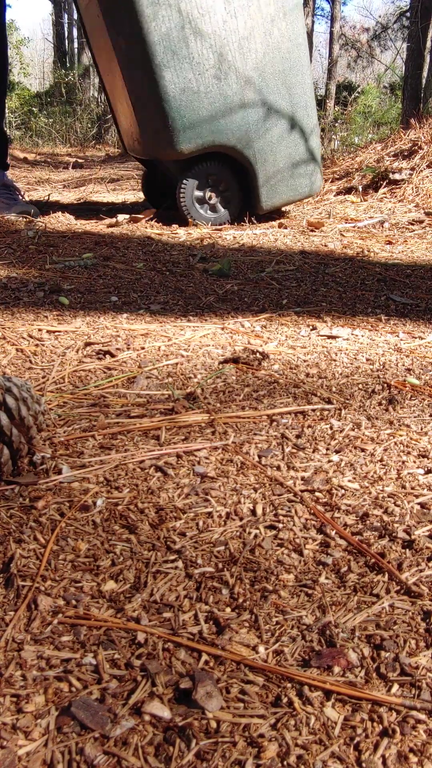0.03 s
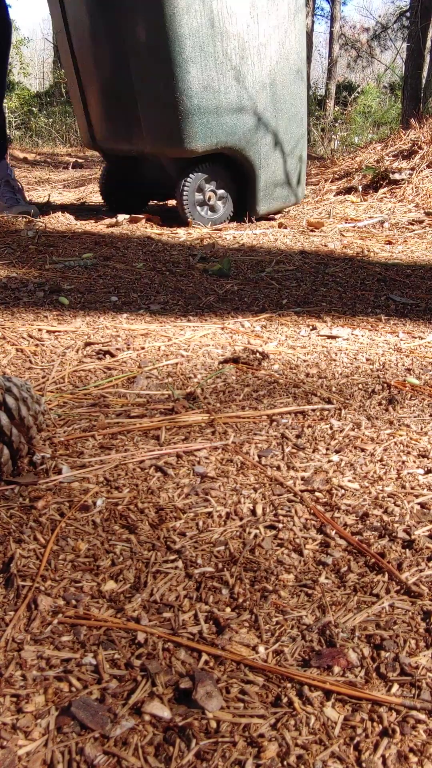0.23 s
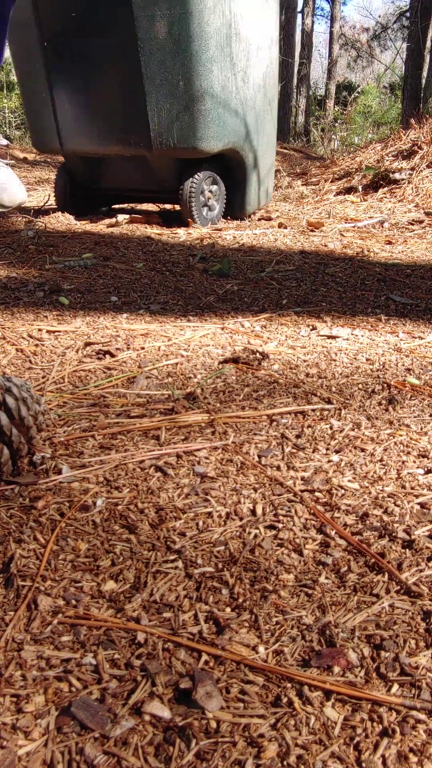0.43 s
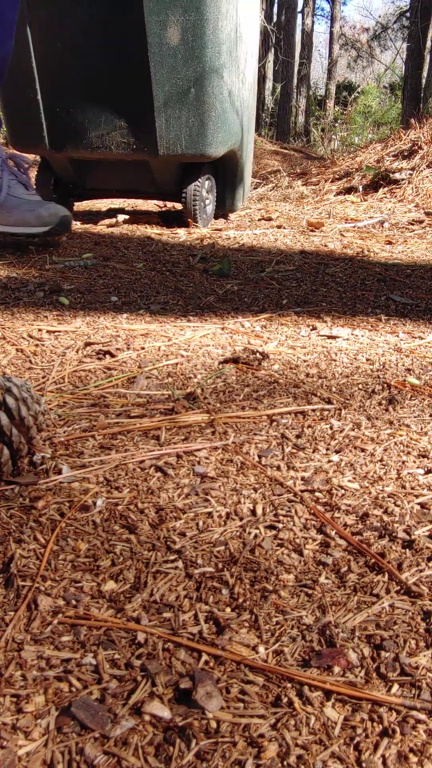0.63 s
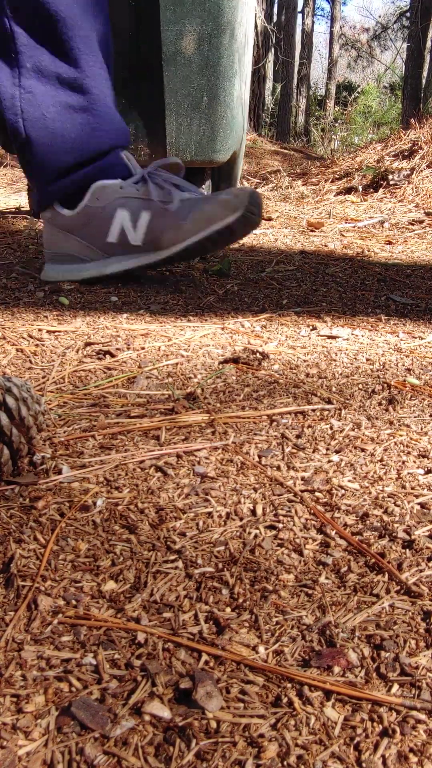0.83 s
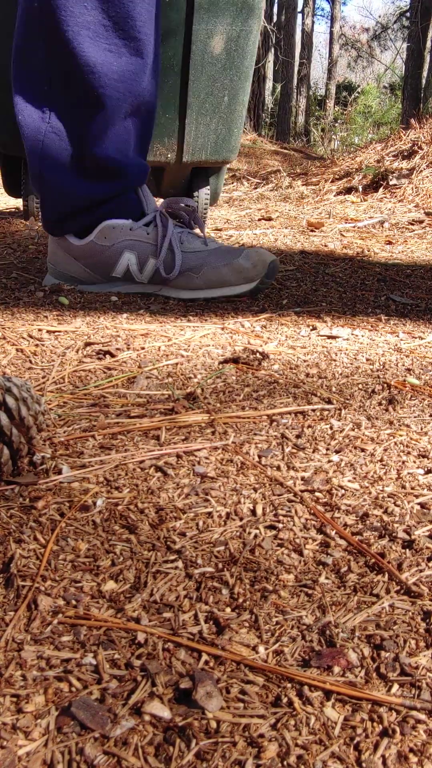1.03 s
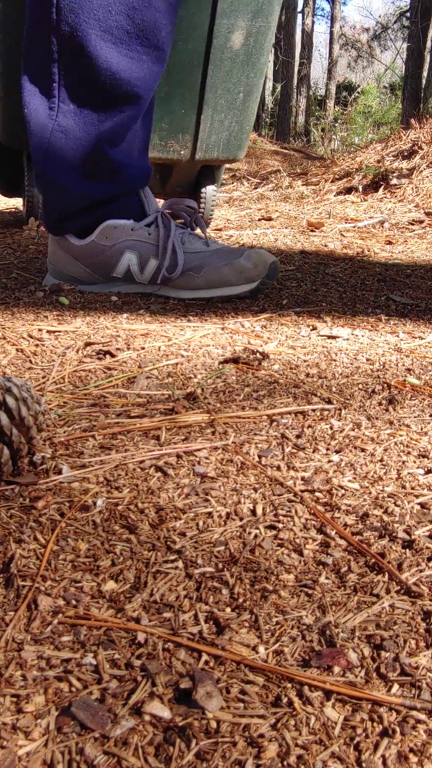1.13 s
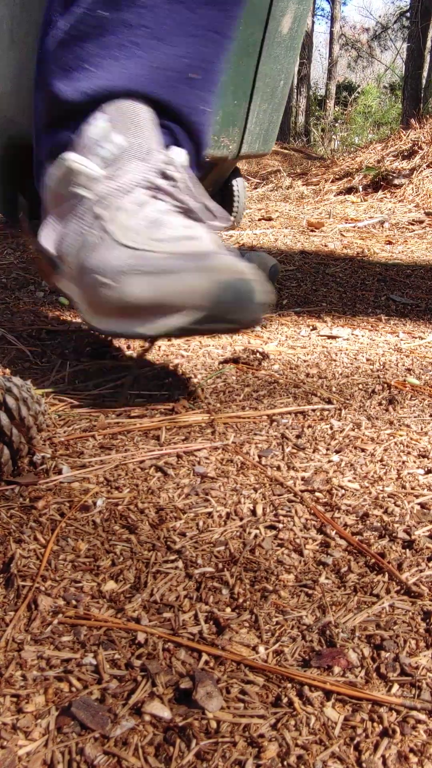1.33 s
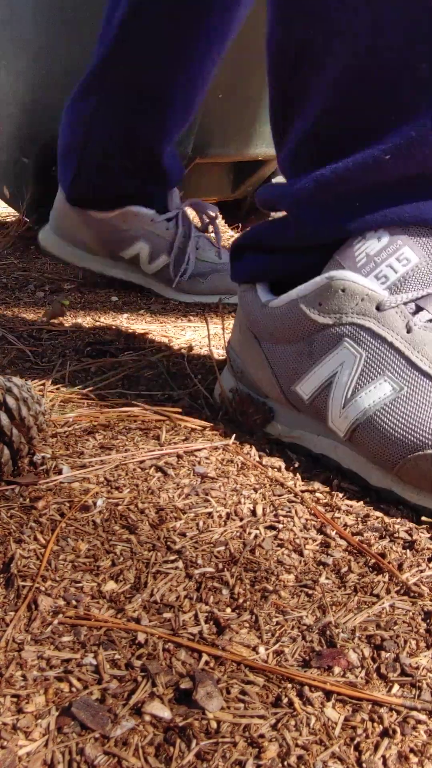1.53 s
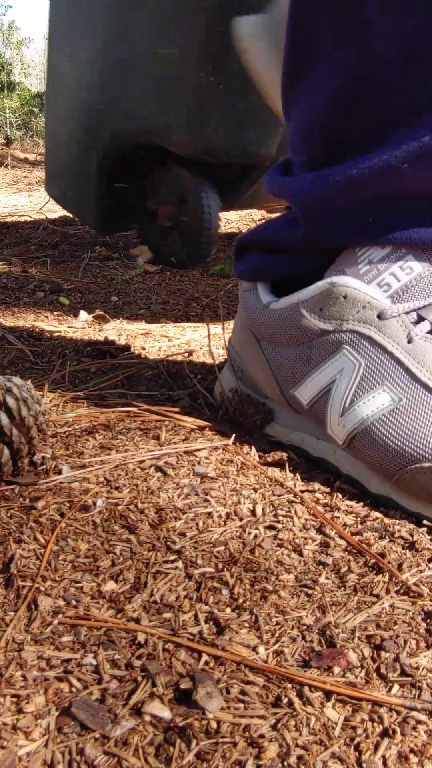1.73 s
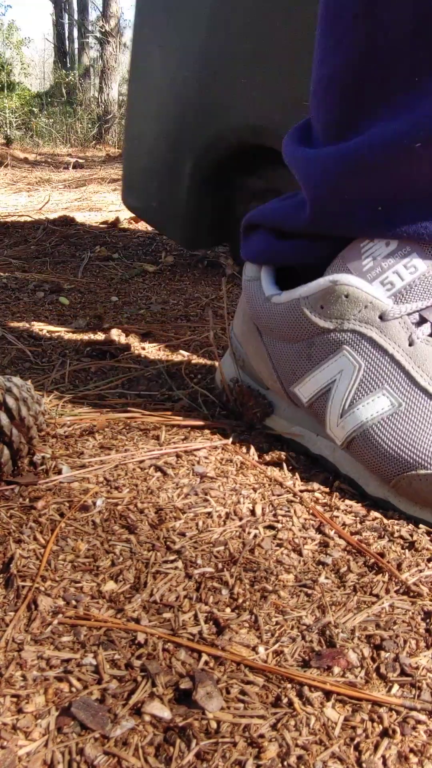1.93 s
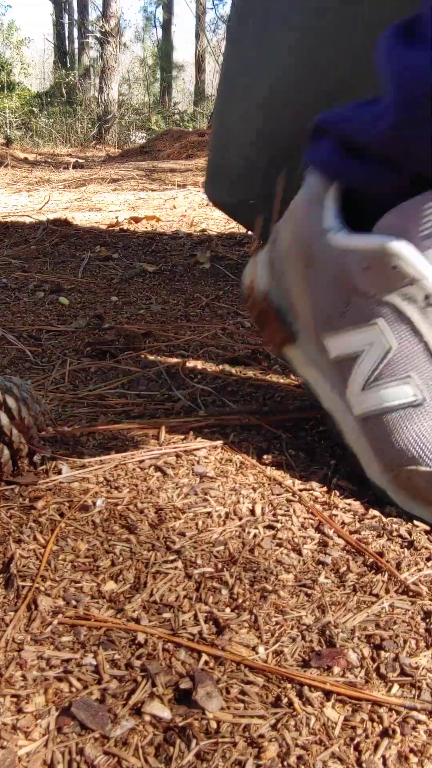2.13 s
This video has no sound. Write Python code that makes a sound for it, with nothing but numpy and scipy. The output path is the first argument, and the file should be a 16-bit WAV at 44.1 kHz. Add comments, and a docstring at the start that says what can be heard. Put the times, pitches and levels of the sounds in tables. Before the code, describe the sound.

Outdoors at ground level, a big empty plastic bin gives one booming knock and low rolling rumble, light litter crackles, then close footsteps thud and crunch with brittle twig snaps, with faint air buffeting the microphone.

```python
"""A hollow plastic wheeled bin thuds as it is tipped onto its wheels, then rumbles and knocks over dry litter.
Struck sines ring its walls and wheels, its cavity booms, and coloured clicks make the rumble; a wheel groans.
Sneaker soles thud and chips clack as decaying sines; mulch, needles and brushing shoes are ringing grains over noise.
Twigs snap in short noise bursts over a faint hiss. Two ports hear it all, and soft low air buffets the left one."""
import sys
import numpy as np
from scipy import signal
from scipy.fft import rfft, irfft, next_fast_len
from scipy.io import wavfile

SR = 44100
rng = np.random.default_rng(int(sys.argv[2]) if len(sys.argv) > 2 else 0)


def store_wav(level_fs):
    """Save 16-bit WAV to argv[1]."""
    pcm = np.round(np.clip(np.atleast_2d(level_fs), -1, 1) * 32767)
    wavfile.write(sys.argv[1], SR, pcm.T.astype(np.int16))


N = 97020
T = np.arange(N) / SR
SIZE = next_fast_len(N + SR // 2, real=True)
HZ = np.maximum(np.arange(SIZE // 2 + 1) * SR / SIZE, 1)
PATHS = 3   # the direct path and a scattered one to each port

# ringing of the bin's walls: (frequency [Hz], level [dB], t60 [s])
SHELL_MODES = [(136.1, -4.5, 0.15), (185.7, -7, 0.22), (224.3, -10.5, 0.28), (276.3, -7, 0.16),
               (306, -23, 0.2), (363.6, -9.5, 0.18), (457.6, -8, 0.095), (531, -18, 0.12), (595, -17, 0.14),
               (679.4, -10, 0.089), (770, -22, 0.23), (948.6, -14.5, 0.059), (1230, -38, 0.07)]
# tone of crunching needles and woody breaks: (frequency [Hz], level [dB])
CRUNCH_COLOUR = [(600, 6), (1200, 5), (1700, 3.5), (2300, 5), (3100, -6), (4500, -12.5), (7000, -29.5),
                 (16000, -81)]
# bright tone of brushed needles, splinters and hiss: (frequency [Hz], level [dB])
BRUSH_COLOUR = [(2000, 8), (5000, -7), (6800, 8.5), (8000, 0.5), (9500, 4), (11200, -4.5), (13000, 15),
                (16000, 2.5)]
CRACKLES_PER_S = 2700
RUSTLE_SHARE = 0.85   # smooth noise against ringing grains, as a ratio of amplitudes


def from_db(db):
    """Decibels to gain."""
    return 10 ** (np.asarray(db) / 20)


def rms_one(x):
    """Scale to unit power."""
    return x / np.sqrt(np.mean(x ** 2) + 1e-20)


def in_time(rows):
    """Gain curves from rows of (time [s], level [dB], ..), straight lines in dB."""
    s, *columns = np.transpose(rows)
    return [from_db(np.interp(T, s, c)) for c in columns]


def at_hz(points):
    """Read a table over log frequency."""
    hz, value = np.transpose(points)
    return np.interp(np.log(HZ), np.log(hz), value)


def fade(t, t60):
    """A fall of 60 dB in t60 seconds."""
    return np.exp(-np.log(1000) * t / t60)


def bump(s, width):
    """A bell-shaped swell of height 1 around time s."""
    return np.exp(-.5 * ((T - s) / width) ** 2)


def colour(x, spectrum):
    """Causal filter with the given spectrum, falling on beyond its top; white noise keeps its power."""
    beyond_top = np.maximum(HZ / spectrum[-1][0], 1)
    gain = rms_one(from_db(at_hz(spectrum)) / beyond_top ** 2)
    # fold the cepstrum forward in time for minimum phase
    cepstrum = irfft(np.log(gain), SIZE)
    cepstrum[1:SIZE // 2] *= 2
    cepstrum[SIZE // 2 + 1:] = 0
    return irfft(rfft(x, SIZE) * np.exp(rfft(cepstrum)), SIZE)[..., :N]


def add(out, s, db, sound):
    """Mix a sound in at a time and level."""
    i = int(np.clip(s * SR, 0, N - 1))
    out[..., i:i + sound.shape[-1]] += from_db(db) * sound[..., :N - i]


def ring(excitation, hz, t60):
    """Two-pole resonator: a unit click sets a sine of height 1 ringing."""
    r = fade(1 / SR, t60)
    w = 2 * np.pi * min(hz, SR * .45) / SR
    return signal.lfilter([0, np.sin(w)], [1, -2 * r * np.cos(w), r * r], excitation + 1e-18)


def partials(modes, t):
    """One dying sine for each mode, in alternating signs."""
    return np.array([(-1) ** k * from_db(db) * np.sin(2 * np.pi * hz * t) * fade(t, t60)
                     for k, (hz, db, t60) in enumerate(modes)])


def clicks(per_s, spread_db):
    """Random clicks, many small and a few large; unit power."""
    sizes = from_db(spread_db * np.minimum(rng.exponential(1, N), 5))
    signs = rng.choice([-1, 1], N)
    return rms_one(sizes * signs * (rng.random(N) < per_s / SR))


def burst(envelope):
    """Even noise under an envelope, different on each path."""
    return np.sign(rng.standard_normal((PATHS, len(envelope)))) * envelope


def grains(per_s, spread_db, low_hz, high_hz, rustle, count=10):
    """Tiny fractures, each ringing a few cycles at a pitch dealt separately on each path, over a smooth rustle."""
    grain_cycles = 8.7   # cycles in a grain's 60 dB fall
    born = clicks(per_s, spread_db) * rng.choice([-1, 1], (PATHS, N))
    dealt = rng.integers(0, count, (PATHS, N))
    ringing = 0
    for k, hz in enumerate(np.geomspace(low_hz, min(high_hz, SR * .45), count)):
        # higher grains are shorter, and start louder in proportion to pitch
        ringing = ringing + ring(born * (dealt == k), hz, grain_cycles / hz) * hz
    return rms_one(rms_one(ringing) + rustle * rng.standard_normal((PATHS, N)))


def rolling():
    """Small bumps under the wheels keep the cavity and the walls humming."""
    # rumble of the rolling bin: (time [s], cavity level [dB], wall level [dB])
    rumble = [(0, -55, -37.5), (.1, -53, -51), (.18, -40.5, -42), (.3, -37.5, -43), (.48, -43.5, -49),
              (.6, -34.5, -54), (.67, -40, -51.5), (.77, -46.5, -43.5), (.88, -43, -53.5),
              (.98, -44, -43.5), (1.12, -47.5, -52.5), (1.28, -39.5, -50.5), (1.35, -54.5, -77),
              (1.43, -34.5, -49.5), (1.57, -46.5, -42.5), (1.68, -45, -49.5), (1.82, -38, -40.5),
              (2.08, -40.5, -42.5), (2.2, -40, -61.5)]
    # hum of the hollow cavity: (frequency [Hz], level [dB])
    cavity_colour = [(20, -40.5), (45, -8), (65, -12.5), (90, -3), (120, 5), (145, -8.5), (200, -9.5),
                     (400, -65)]
    # hum of the walls: (frequency [Hz], level [dB])
    wall_colour = [(60, -24.5), (140, -1), (190, 5), (270, 9), (370, 1.5), (470, -3), (700, -32.5),
                   (1500, -42)]
    bumps_per_s, wall_ring_db = 260, -16
    cavity_gain, wall_gain = in_time(rumble)
    bumps = clicks(bumps_per_s, 3.5)
    ringing = rms_one(sum((-1) ** k * from_db(db) * ring(bumps, hz, t60)
                          for k, (hz, db, t60) in enumerate(SHELL_MODES)))
    walls = rms_one(colour(bumps, wall_colour) + from_db(wall_ring_db) * ringing)
    cavity = rms_one(colour(clicks(bumps_per_s, 0.87), cavity_colour))
    return cavity_gain * cavity + wall_gain * walls


def litter():
    """Mulch crumbles dully under soles and tyres; dry needles on top crunch and crackle, in uneven clusters."""
    # crushed mulch: (time [s], level [dB])
    crush_levels = [(0, -39), (.09, -49.5), (.145, -48.5), (.3, -52), (.41, -43.5), (.49, -57),
                    (.58, -48.5), (.605, -43), (.67, -48), (.72, -53), (.845, -55.5), (.865, -42),
                    (.96, -41), (1.06, -54), (1.25, -59), (1.34, -74), (1.41, -50), (1.47, -49.5),
                    (1.53, -36.5), (1.68, -47.5), (1.86, -45), (2.12, -45.5), (2.2, -51)]
    # dull tone of mulch: (frequency [Hz], level [dB])
    mulch_colour = [(150, -13), (350, 11), (550, 2.5), (950, 3.5), (1300, -0.5), (1800, -17.5),
                    (3000, -13.5), (8000, -74)]
    # breaking needles: (time [s], crunch level [dB], fine crackle level [dB])
    needle_levels = [(0, -55, -53), (.035, -44, -60.5), (.08, -66, -58.5), (.3, -59.5, -60),
                     (.43, -53.5, -59), (.49, -61.5, -58.5), (.575, -59.5, -56.5), (.605, -46.5, -47),
                     (.65, -66, -63.5), (.745, -55.5, -56), (.83, -73, -66), (.875, -55.5, -67),
                     (.95, -49.5, -56.5), (1.1, -58.5, -61.5), (1.2, -60, -61), (1.26, -53, -57),
                     (1.3, -77, -71), (1.345, -65, -72.5), (1.38, -60, -62), (1.47, -59, -55.5),
                     (1.52, -40.5, -47.5), (1.6, -48, -57.5), (1.69, -55, -55.5), (1.82, -56, -50),
                     (1.925, -49, -49), (1.96, -52, -54.5), (2.11, -46.5, -49), (2.2, -50, -55)]
    # bright tone of the fine crackle: (frequency [Hz], level [dB])
    crackle_colour = [(1500, -3.5), (3500, -4), (5500, -5.5), (6700, 6.5), (7900, -6.5), (9400, -4),
                      (11200, -17), (12500, -1), (15500, -15.5), (17000, 0.5)]
    crumbs_per_s, crunches_per_s = 1800, 1500
    clumps_per_s, clump_db = 90, 1.4
    knots = np.arange(0, T[-1] + 1, 1 / clumps_per_s)
    unevenness = np.interp(T, knots, rng.standard_normal(len(knots)))
    clumps = rms_one(from_db(clump_db * unevenness))
    crush_gain, = in_time(crush_levels)
    crunch_gain, crackle_gain = in_time(needle_levels)
    crumbs = grains(crumbs_per_s, 1.7, 369, 1870, RUSTLE_SHARE)
    crunches = grains(crunches_per_s, 2.5, 1300, 10200, 0.93)
    crackles = grains(CRACKLES_PER_S, 3, 2100, 18600, RUSTLE_SHARE)
    mulch = crush_gain * rms_one(colour(crumbs, mulch_colour))
    crunch = clumps * crunch_gain * rms_one(colour(crunches, CRUNCH_COLOUR))
    # the crackle follows the clusters more gently
    crackle = np.sqrt(clumps) * crackle_gain * rms_one(colour(crackles, crackle_colour))
    return mulch + crunch + crackle


def air_hiss():
    """A steady faint hiss of coloured noise."""
    return from_db(-72) * colour(rng.standard_normal((PATHS, N)), BRUSH_COLOUR)


def knocks():
    """Each jolt gives a slap, crack and rattle, ringing walls and wheels, and a boom that swells as its pitch settles."""
    # the bin is jolted: (time [s], shell level [dB], cavity boom level [dB], rattle level [dB], crack level [dB])
    jolts = [(0.002, -30, -27, -38, -57), (0.022, -40.5, -22.5, -35, -35.5), (0.143, -33.5, -40, -74, -64),
             (0.1997, -15.5, -1.5, -15, -15), (0.213, -25.5, -16, -25, -61), (0.247, -28, -19.5, -58, -68),
             (0.2871, -44, -27.5, -60, -70), (0.3461, -47, -62.5, -34, -38), (0.3839, -36, -51, -30, -26.5),
             (0.595, -54, -52, -42, -50), (0.659, -36.5, -55, -43.5, -72), (0.7729, -42, -51, -50, -41),
             (0.854, -47, -40, -39, -64), (0.877, -50, -34.5, -35.5, -39.5), (1.391, -33, -29, -53, -65),
             (1.486, -21, -46, -29, -29.5), (1.497, -36, -21.5, -28, -50),
             (1.513, -26.5, -33, -26.5, -29.5), (1.556, -32, -20, -47, -51),
             (1.782, -32.5, -20, -28, -34.5), (1.912, -55, -58, -40, -44), (1.931, -47, -62, -38, -42),
             (2.021, -29, -23, -46, -53), (2.095, -35, -37, -48, -55)]
    # hard wheels ring after a crack: (frequency [Hz], level [dB], t60 [s])
    wheel_modes = [(1500, -16, .06), (1670, -10, 0.095), (1844, -10, 0.042), (2110, -23.5, .07),
                   (2530, -21, 0.066), (2660, -28, 0.064), (3450, -24.5, 0.082), (4800, -33, 0.054)]
    # loose wheels and lid rattle: (frequency [Hz], level [dB])
    rattle_colour = [(40, -71), (80, -14), (200, 1), (400, 0), (700, 5.5), (1000, 5), (1500, -13.5),
                     (3000, -31.5), (8000, -45)]
    # hard plastic contact: (frequency [Hz], level [dB])
    crack_colour = [(300, -3.5), (900, 4), (1400, 5.5), (1900, 8), (2600, -1.5), (4000, -6.5), (5500, -14),
                    (6600, -12), (9000, -13.5), (11000, -60), (16000, -35)]
    boom_hz, boom_rise_hz, boom_settle_s = 129.4, 48.6, 0.017
    boom_swell_s, boom_t60_s = 0.017, 0.094
    thump_hz, thump_db, thump_t60_s = 66.2, -24, 0.38   # the ground gives under a jolt
    rattle_t60_s = 0.054
    crack_t60_s, crack_tail_db, crack_tail_t60_s = 0.0065, -18, 0.12
    push_db, slap_db = 14, 1.5   # first hard contact, above the rattle and crack that follow
    mode_spread_db = 1.2   # each jolt excites the wall modes a little differently

    shell, boom, rattle, crack = np.zeros((4, PATHS, N))
    t = T[:SR // 2]
    pitch = boom_hz - boom_rise_hz * np.exp(-t / boom_settle_s)
    swell = (1 - np.exp(-(t / boom_swell_s) ** 2)) * fade(t, boom_t60_s)
    cavity = np.sin(2 * np.pi * np.cumsum(pitch) / SR) * swell / swell.max() / 2
    thump = from_db(thump_db) * np.sin(2 * np.pi * thump_hz * t) * fade(t, thump_t60_s)
    modes = partials(SHELL_MODES, t)
    wheels = partials(wheel_modes, t).sum(axis=0)
    crack_envelope = fade(t, crack_t60_s) + from_db(crack_tail_db) * fade(t, crack_tail_t60_s)
    contact = np.zeros((PATHS, len(t)))
    contact[0, 0] = -1   # one click, on the direct path only
    for s, shell_db, boom_db, rattle_db, crack_db in jolts:
        mode_gains = from_db(rng.normal(0, mode_spread_db, len(SHELL_MODES)))
        add(shell, s, shell_db, mode_gains @ modes)
        add(shell, s, crack_db, wheels)
        add(boom, s, boom_db, cavity + thump)
        add(rattle, s, rattle_db, from_db(push_db) * contact + burst(fade(t, rattle_t60_s)))
        add(crack, s, crack_db, from_db(slap_db) * contact + burst(crack_envelope))
    return shell + boom + colour(rattle, rattle_colour) + colour(crack, crack_colour)


def twigs():
    """Each snap is a dry tick with a woody crunch and a spray of bright splinters, all short noise bursts."""
    # single twigs snap: (time [s], dry tick level [dB], woody crunch level [dB], bright splinter level [dB])
    snaps = [(.003, -38.5, -59, -74), (0.035, -41.5, -43, -70), (.127, -42.5, -74, -46.5),
             (.1995, -32.5, -45, -63), (.345, -48, -47, -63), (.386, -51, -32.5, -68),
             (.595, -71, -50, -63), (.679, -43.5, -75.5, -58), (.774, -46, -53, -45),
             (0.878, -51, -56, -50), (0.953, -48, -30, -46), (1.355, -67, -49.5, -66),
             (1.389, -45.5, -69, -46), (1.516, -35.5, -28, -32), (1.558, -52, -35, -60),
             (1.576, -53, -45, -60), (1.6, -40.5, -32, -53), (1.674, -45, -36.5, -59),
             (1.735, -39.5, -49, -60), (1.851, -39.5, -43, -42), (1.855, -34, -33, -44),
             (1.867, -39.5, -33, -59), (1.883, -38, -46, -49), (1.913, -31, -44, -44),
             (1.917, -55, -31, -43), (1.926, -42.5, -30.5, -40), (1.934, -43, -32, -54),
             (1.952, -50, -59.5, -63), (1.985, -49, -31, -64), (2.072, -39, -45, -62),
             (2.081, -45, -41, -59), (2.119, -61, -43, -60), (2.153, -42, -55, -39.5),
             (2.192, -33.5, -44, -53)]
    # tone of the dry tick: (frequency [Hz], level [dB])
    tick_colour = [(1500, -5), (3500, -8.5), (5500, -4), (6700, 10.5), (7900, -9.5), (9400, -1),
                   (11200, -25), (13000, -4), (16000, -5)]
    snap_rise_s, snap_t60_s, woody_t60_s = 0.00012, 0.009, 0.015
    ticks, wood, splinters = np.zeros((3, PATHS, N))
    t = T[:SR // 20]
    snap = (1 - np.exp(-t / snap_rise_s)) * fade(t, snap_t60_s)
    snap = snap / snap.max()
    for s, tick_db, wood_db, splinter_db in snaps:
        add(ticks, s, tick_db, burst(snap))
        add(wood, s, wood_db, burst(fade(t, woody_t60_s)))
        add(splinters, s, splinter_db, burst(snap))
    return colour(ticks, tick_colour) + colour(wood, CRUNCH_COLOUR) + colour(splinters, BRUSH_COLOUR)


def wind():
    """Soft low puffs of air: dark noise under bell-shaped swells."""
    # air buffets the port: (time [s], width [s], level [dB])
    puffs = [(.12, 0.051, -42.5), (.48, 0.076, -41.5), (.94, 0.023, -34), (1.03, 0.051, -42)]
    # low tone of the air: (frequency [Hz], level [dB])
    wind_colour = [(15, -13), (45, 1.5), (70, 3.5), (130, -14), (300, -39), (900, -78)]
    gusts = sum(from_db(db) * bump(s, width) for s, width, db in puffs)
    return gusts * rms_one(colour(rng.standard_normal(N), wind_colour))


def footfalls():
    """Soles press into springy mulch in dull thuds of a few cycles each; wood chips clack underfoot."""
    # heel and sole press into the mulch: (time [s], level [dB], frequency [Hz])
    thuds = [(1.4856, -16.5, 356), (1.497, -19, 218), (1.511, -15, 327), (1.541, -21.5, 239),
             (1.555, -18, 200), (1.779, -24, 392), (1.785, -18.5, 218), (1.989, -25, 204),
             (2.0225, -18.5, 369), (2.034, -24.5, 285)]
    # wood chips clack: (time [s], level [dB])
    clacks = [(.386, -30), (1.43, -36), (1.515, -24), (1.561, -41)]
    foot_rise_s, foot_t60_s = 0.0007, 0.051
    chip_hz, chip_t60_s = 1220, 0.02
    out = np.zeros((PATHS, N))
    t = T[:SR // 5]
    envelope = (1 - np.exp(-t / foot_rise_s)) * fade(t, foot_t60_s)
    for s, db, hz in thuds:
        add(out, s, db, -np.sin(2 * np.pi * hz * t) * envelope)
    for s, db in clacks:
        add(out, s, db, np.sin(2 * np.pi * chip_hz * t) * fade(t, chip_t60_s))
    return out


def brush():
    """Short bright swishes of a shoe through the needles, made of dense grains."""
    # strokes of the shoe: (start [s], end [s], level [dB])
    swishes = [(0.42, 0.557, -66), (0.667, 0.725, -46.5), (0.853, 0.926, -59), (1.186, 1.303, -62.5)]
    edge_s = 0.012
    strokes = sum(from_db(db) * np.clip(np.minimum(T - start, end - T) / edge_s, 0, 1)
                  for start, end, db in swishes)
    needles = grains(2 * CRACKLES_PER_S, 2.8, 3300, 11000, RUSTLE_SHARE)
    return strokes * colour(needles, BRUSH_COLOUR)


def groan():
    """A wheel rubs for a moment and hums: noise through a narrow resonance."""
    # the rub: (time [s], width [s], level [dB], frequency [Hz], t60 [s])
    rub = (.642, .02, -45, 435, .07)
    s, width, db, hz, t60 = rub
    return from_db(db) * bump(s, width) * rms_one(ring(rng.standard_normal(N), hz, t60))


def ports(paths):
    """Two ports hear the direct sound with their own shading and delay, plus scatter off the ground."""
    # shading: (frequency [Hz], left minus right [dB])
    balance = [(120, 0.5), (300, -1), (520, -3.5), (780, -8.5), (1100, -5.5), (1500, -2), (2300, 15),
               (3300, 5), (5000, 4.5), (6700, 11), (8500, 9.5), (14000, 5.5)]
    # phase by which left leads: (frequency [Hz], lead [rad])
    phase_lead = [(40, 0), (120, .11), (300, .29), (520, .76), (780, 1.12), (1100, 2.05), (2000, 3.7),
                  (4000, 4), (9000, 9), (16000, 3)]
    # scattered sound: (frequency [Hz], share of power [0-1])
    scatter = [(100, 0.0018), (400, 0.0061), (750, 0.092), (1200, 0.2), (2200, 0.39), (4500, 0.98),
               (8000, 0.98)]
    spectra = rfft(paths, SIZE)
    share = np.clip(at_hz(scatter), 0, 1)
    side = np.array([[.5], [-.5]])   # half of each difference to either port
    heard = np.sqrt(1 - share) * spectra[0] + np.sqrt(share) * spectra[1:]
    heard = heard * np.exp(1j * side * at_hz(phase_lead))
    shade = from_db(side * at_hz(balance))
    shade = shade / np.sqrt(np.mean(shade ** 2, axis=0))   # keep the pair's mean power
    return irfft(heard * shade, SIZE)[:, :N]


def scene():
    """Bin, feet and ground at the two ports, with wind on the left one."""
    bin_sound = rolling() + knocks() + groan()
    feet_and_ground = litter() + twigs() + footfalls() + brush()
    left_only = np.array([[1], [0]])
    return ports(bin_sound + feet_and_ground + air_hiss()) + wind() * left_only


def record(dry):
    """A steep elliptic low-pass cuts the top."""
    cutoff_hz = 16300
    return signal.sosfilt(signal.ellip(10, .1, 80, cutoff_hz, fs=SR, output="sos"), dry)


dry = scene()
out = record(dry)
store_wav(out)
```